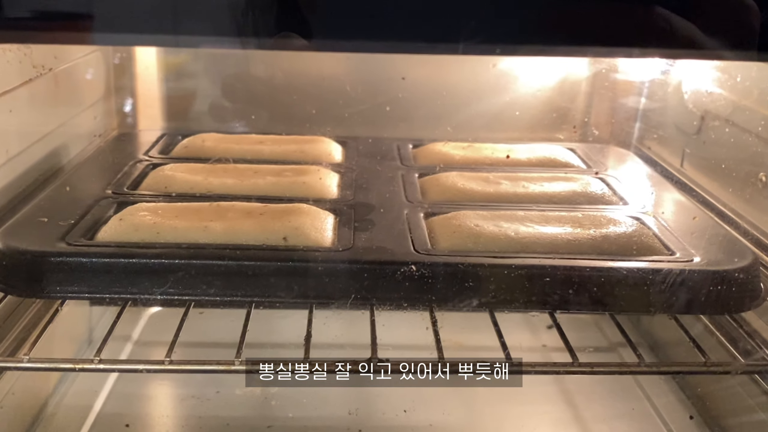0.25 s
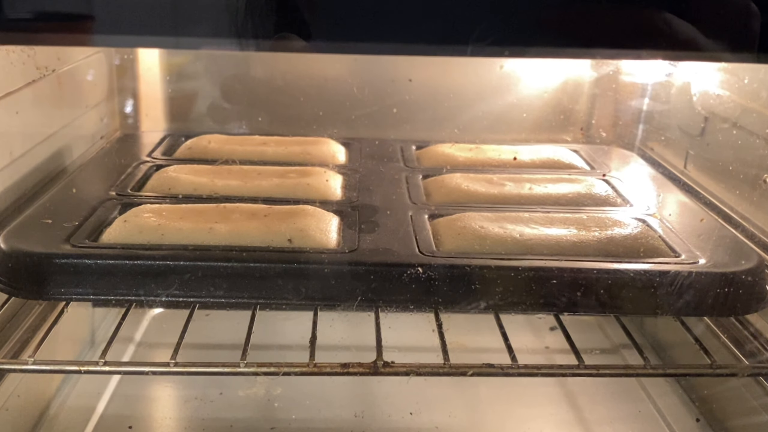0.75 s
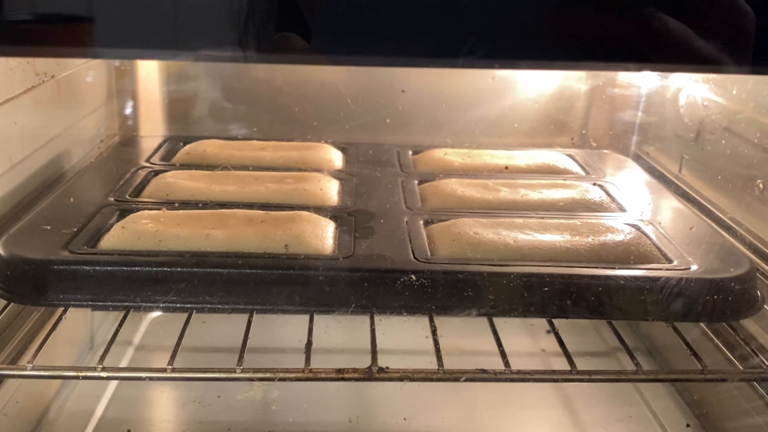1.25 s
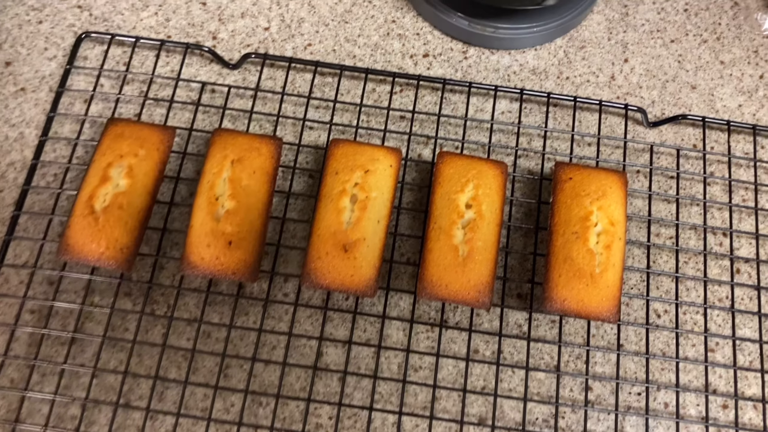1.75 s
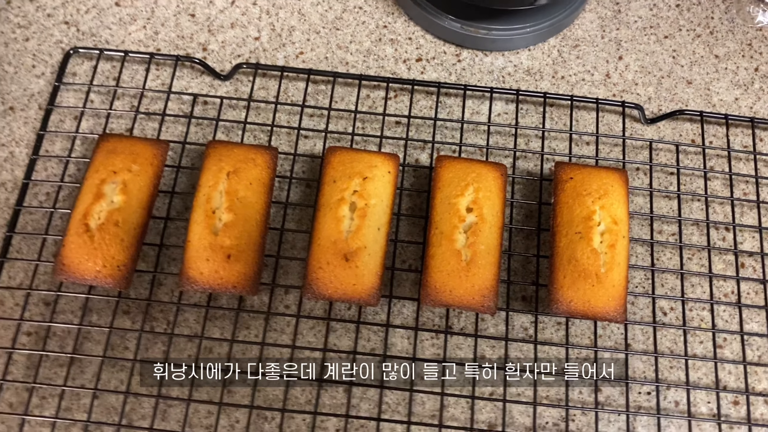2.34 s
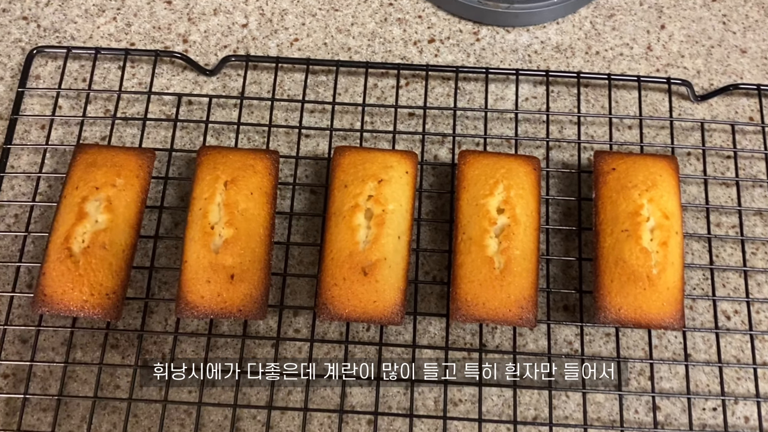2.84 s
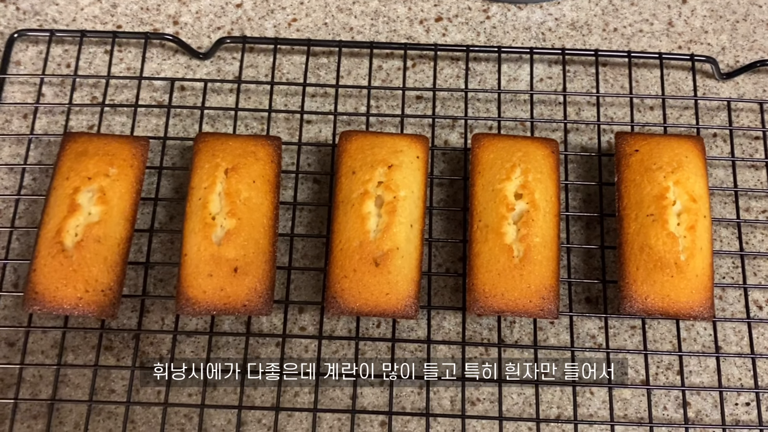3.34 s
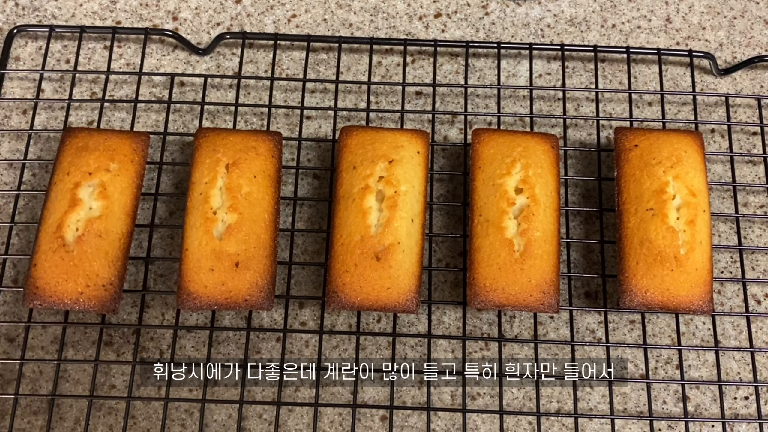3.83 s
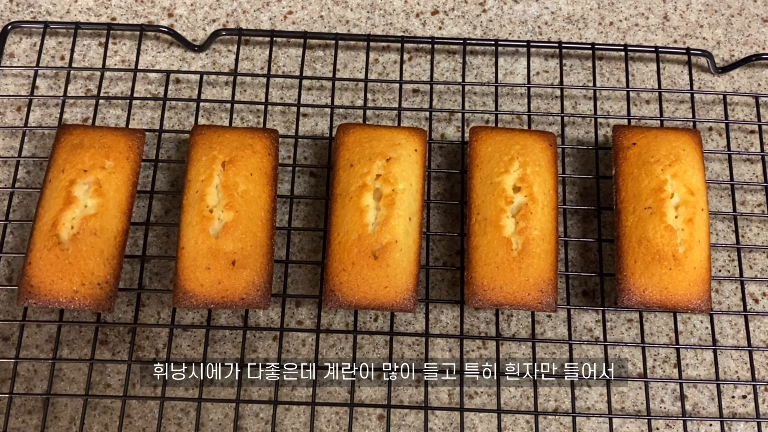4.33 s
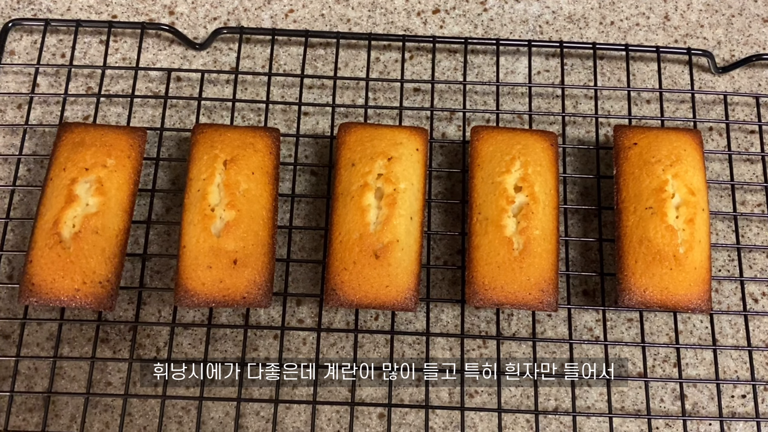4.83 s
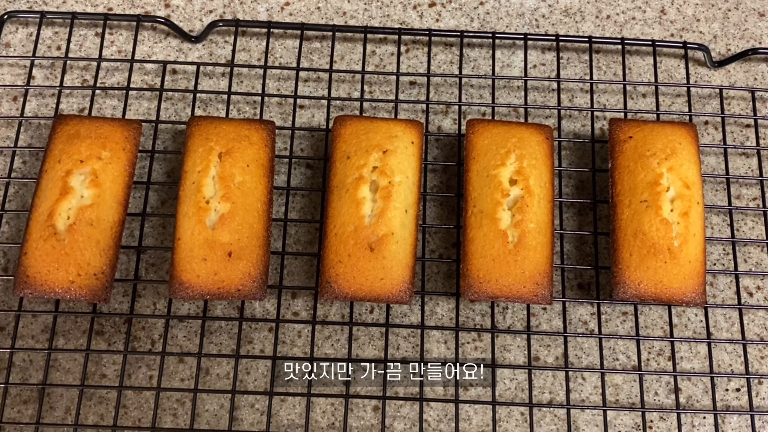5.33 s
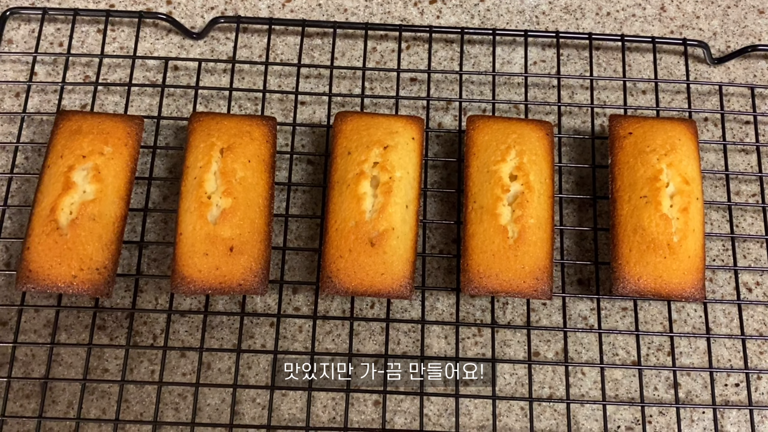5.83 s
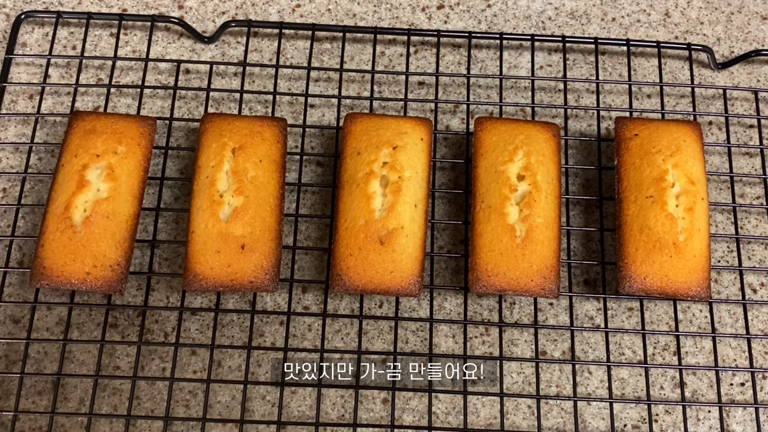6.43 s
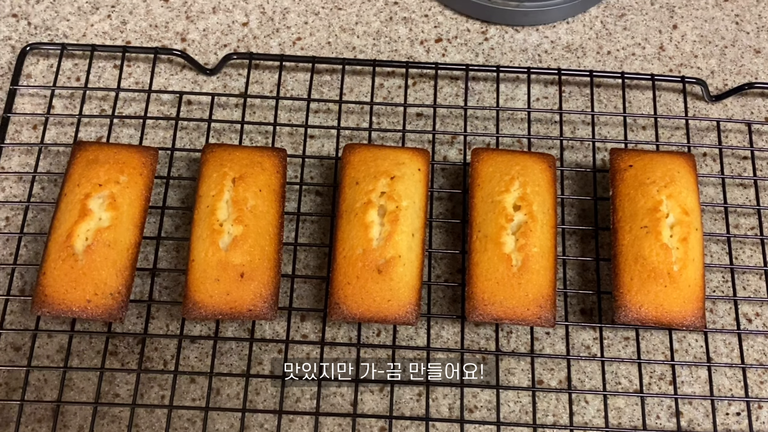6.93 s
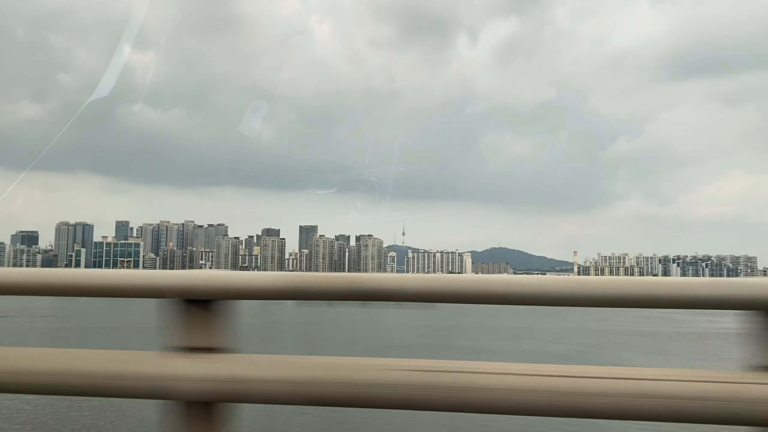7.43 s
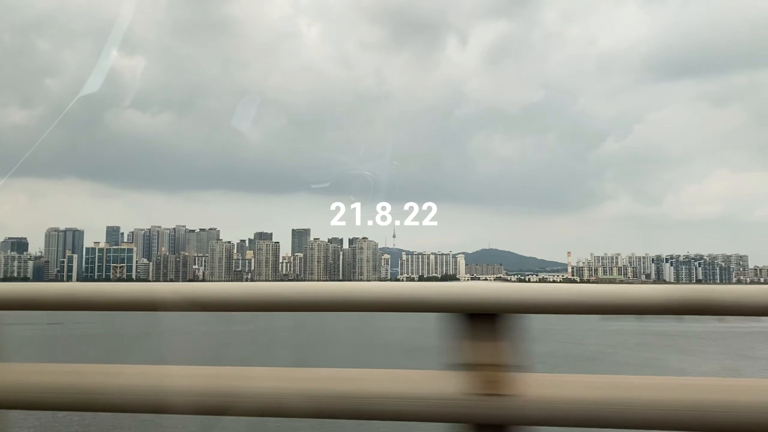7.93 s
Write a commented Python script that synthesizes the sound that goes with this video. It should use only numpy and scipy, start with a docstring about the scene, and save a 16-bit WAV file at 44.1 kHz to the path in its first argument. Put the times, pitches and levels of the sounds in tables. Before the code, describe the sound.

A small clockwork timer ticks faintly and evenly over a very quiet kitchen hum, then a hard cut to loud car road roar and two sharp button clicks.

```python
"""A toaster oven's clockwork timer ticks in a quiet kitchen: each beat is ringing modes plus fading noise.
Filtered noise makes the low appliance hum, oven buzz and hiss; short noise bursts make faint handling.
The scene cuts to a car cabin at speed: low noise makes the tyre boom, higher noise the rushing air.
Near the end a small button, like that of a computer mouse, clicks down and springs back:
each click is a noise snap, short ringing tones and a bright noise echo; a faint swell precedes the second."""
import sys
import numpy as np
from scipy import signal
from scipy.fft import rfft, irfft
from scipy.io import wavfile
from scipy.ndimage import uniform_filter1d

SR = 44100
rng = np.random.default_rng(int(sys.argv[2]) if len(sys.argv) > 2 else 0)


def generate_wav(signal):
    """Clip the signal to [-1, 1] and save it as 16-bit WAV at the path in sys.argv[1]."""
    frames = np.transpose(np.atleast_2d(signal))
    scaled = np.clip(frames, -1, 1) * 32767
    pcm = np.round(scaled).astype(np.int16)
    wavfile.write(sys.argv[1], SR, pcm)


N = 360280
T = np.arange(N) / SR  # time of every sample [s]

# clear tones of the timer housing: (frequency [Hz], relative level [dB], time to fall 60 dB [s])
TIMER_TONES = [(1442, -1, .1), (2020, 1.5, .065), (2095, 2, .075), (3057, -4, .06), (3402, -3, .06),
               (3671, 0, .065), (4015, -4, .055), (4400, -3, .07), (5211, -6, .07), (6470, -7, .08),
               (10465, -2, .03), (12930, -2, .025)]
# dense ring of the gear plates: (frequency [Hz], relative level [dB])
GEAR_PLATE_COLOUR = [(500, -15), (900, -8), (1800, -2), (2500, -8), (3400, 1), (4400, 0), (4850, -10),
                     (5300, -1), (7200, -2), (8200, -4), (10600, -3), (12000, -11), (13000, -5),
                     (14000, -25), (16000, -42)]
# the timer's echo in the kitchen: (frequency [Hz], relative level [dB])
KITCHEN_ECHO_COLOUR = [(400, -9), (1400, 0), (2500, -2), (3700, 2), (4450, 1), (4850, -8), (5250, -1),
                       (6800, -1), (7800, -9), (10500, -11), (13000, -16), (14200, -40)]
# the timer at the oven door, then from the worktop:
# (start [s], end [s], time of one tick [s], relative level [dB])
TIMER_SPELLS_HEARD = [(0, 1.5, .1775, -57.3), (1.5, 7.1, 1.8070, -59.8)]
# building rumble: (frequency [Hz], relative level [dB])
RUMBLE_COLOUR = [(20, -27), (35, -13), (50, -5), (68, 0), (82, -4), (97, -1), (120, -6), (150, -9),
                 (220, -30)]
# appliance drone: (frequency [Hz], relative level [dB])
DRONE_COLOUR = [(90, -22), (160, 0), (215, -2), (265, -1), (370, 0), (450, -5), (600, -8), (800, -14),
                (1300, -19), (2000, -32)]
# wavering hum lines within the drone: (frequency [Hz], relative level [dB])
HUM_LINES = [(302, -9), (360, -15)]
# even kitchen hiss: (frequency [Hz], relative level [dB])
HISS_COLOUR = [(200, -1), (700, -1.5), (1000, -2), (1300, -1.5), (1800, -11), (3000, -19), (5000, -27),
               (8000, -24.5), (12500, -28), (14000, -39)]
# shared level of rumble and drone, which sinks for a while: (time [s], level [dB])
BACKGROUND_LEVEL = [(0, -65.5), (1.48, -65.5), (1.65, -71), (2.45, -70.5), (3.2, -75.5), (3.8, -74.5),
                    (4.25, -65.5), (7.1, -65)]
# swells of the oven shell's buzz: (centre [s], half-width [s], level [dB])
OVEN_BUZZ_SWELLS = [(.02, .11, -62), (1.24, .13, -64)]
# light taps of handling: (time [s], approximate peak level [dB], time to fall 60 dB [s])
HANDLING_TAPS = [(4.5206, -58, 0.21), (4.816, -56, 0.18), (5.0144, -62, 0.18), (6.1144, -51, 0.26)]
# sound colour of the taps: (frequency [Hz], relative level [dB])
TAP_SPECTRUM = [(1000, -20), (3000, -7), (5800, 0), (8500, -1), (12500, -7), (14000, -24)]
# soft brushing: (centre [s], length [s], dull rub level [dB], bright swish level [dB])
HANDLING_BRUSHES = [(1.27, .2, -75, -92), (1.59, .14, -79, -73), (1.78, .12, -82, -71),
                    (1.95, .16, -75, -77), (2.25, .13, -79, -76), (4.84, .05, -82, -74),
                    (5.05, .09, -84, -76), (6.98, .34, -76, -80)]
# soft low thuds: (centre [s], level [dB])
LOW_THUDS = [(2.35, -70), (3.47, -63)]
# stereo width in the kitchen: (frequency [Hz], gain of the left-right difference [dB])
KITCHEN_WIDTH = [(400, 0), (900, 2), (1500, 0), (3300, -2), (4800, 1), (6500, -2), (8500, 3), (10500, 7),
                 (12500, 12), (14200, 19), (16000, 16)]
# balance between the ears in the kitchen: (frequency [Hz], left minus right [dB])
KITCHEN_BALANCE = [(60, 0), (200, 1), (330, 3.5), (550, 4), (850, 3), (1800, 1), (6000, 0)]
# tyre boom through the car body: (frequency [Hz], relative level [dB])
BOOM_COLOUR = [(15, -30), (28, -16), (45, -7), (60, -6), (75, -3), (85, -5), (100, 2.5), (112, 1),
               (127, -7), (150, -4), (175, -6), (198, -14), (228, -7), (290, -32)]
# bumps in the road that lift the boom: (time [s], lift [dB])
ROAD_BUMPS = [(7.14, 5), (7.85, 3.5), (8.0, 2)]
# rush of tread and wind: (frequency [Hz], relative level [dB])
RUSH_COLOUR = [(180, -16), (250, -1), (290, -5), (400, -9), (500, -11), (600, -17), (820, -16), (1050, -19),
               (1300, -22), (1900, -30), (3000, -40), (4300, -48), (5300, -56), (8000, -58), (9500, -69)]
# ringing cabin panels: (frequency [Hz], width [Hz], level relative to the rush [dB])
CABIN_PANELS = [(354, 13, -4), (446, 16, -12), (1245, 35, -21)]
# balance between the ears in the car: (frequency [Hz], left minus right [dB])
CABIN_BALANCE = [(100, 0), (150, -1), (215, -5), (330, -2), (500, 1), (800, 2), (2000, 0)]
# button going down: (time [s], snap level [dB], ring level [dB], echo level [dB])
PRESS_STROKE = (7.8963, -19, -6.5, -35.5)
# button springing back: (time [s], snap level [dB], ring level [dB], echo level [dB])
RELEASE_STROKE = (8.025, -10.5, -12, -35)
# tones of the press: (frequency [Hz], relative level [dB], time to fall 60 dB [s])
PRESS_TONES = [(820, -15, .03), (1450, -20, .012), (2200, -12, .016), (3110, -18, .015), (3400, -19, .015),
               (4310, -14, .018), (4950, -21, .012), (5904, -18, .012), (6940, -21, .02), (9450, -22, .016),
               (10050, -22, .012), (12500, -13, .006), (14095, 1.8, .018)]
# tones of the release: (frequency [Hz], relative level [dB], time to fall 60 dB [s])
RELEASE_TONES = [(2502, -14, .011), (3300, -17, .011), (4322, -13, .011), (6830, -5, .008),
                 (8087, -5.5, .012), (11055, -8, .01), (12220, -5, .01), (12480, -2, .013),
                 (13370, -1, .01), (14320, -8, .009)]
# snap of the button: (frequency [Hz], relative level [dB])
SNAP_COLOUR = [(500, -9), (2000, -12), (4300, -8), (5300, -16), (6900, 0), (10500, -8), (12800, 4),
               (14500, -2), (16000, -16)]
# short echo of the button: (frequency [Hz], relative level [dB])
BUTTON_ECHO_COLOUR = [(700, -4), (2600, -3), (4300, -9), (5400, -16), (6700, 0), (8200, 0), (10500, -12),
                      (11500, -11), (13000, 1), (14400, 1), (15200, -14), (16000, -30)]

CUT_S, TOP_HZ = 7.124, 16000
# one full swing of the balance wheel, and the tock that follows each tick
SWING_S, TOCK_LAG_S = .4696, .2385
TOCK_DB, BEAT_SCATTER_DB = -1.8, .6
SHOT_CUT_S = 1.5  # the view cuts from the oven door to the worktop
# rumble and drone are relative to the background level
RUMBLE_DB, RUMBLE_RISE_DB_PER_S, DRONE_DB, HISS_DB = -3.5, .7, 1.7, -76.3
BUZZ_HZ, BUZZ_DB = 244, -74
RUB_HZ, SWISH_HZ = 2400, 9300
THUD_HZ, THUD_WIDTH_HZ, THUD_S = 68, 14, .14
BOOM_DB, BUMP_S, RUSH_DB = -23.2, .025, -38.6


def undb(db):
    """Turn decibels into a plain multiplier."""
    return 10 ** (np.asarray(db) / 20)


def unit(x):
    """Scale to an average strength (rms) of 1."""
    return x / np.sqrt(np.mean(x ** 2))


def curves(table):
    """Join the points of each column after the time with straight lines."""
    s, *columns = np.transpose(table)
    return [np.interp(T, s, column) for column in columns]


def swell(s, half_width_s):
    """A smooth rise and fall around time s, 1 at its top."""
    return np.exp(-((T - s) / half_width_s) ** 2)


def noise(spectrum, size=N, channels=1):
    """Noise of rms 1, coloured by (frequency [Hz], level [dB]) points."""
    hz, db = np.transpose(spectrum)
    f = np.maximum(np.fft.rfftfreq(size, 1 / SR), 1)
    gain = undb(np.interp(np.log(f), np.log(hz), db))
    # roll off beyond the first and last points
    gain = gain * np.minimum(f / hz[0], 1) ** 2 * np.minimum(hz[-1] / f, 1) ** 4
    white = rng.standard_normal((channels, size))
    return unit(irfft(rfft(white) * gain, size))


def band(hz, width_hz, size=N, channels=1):
    """Noise of rms 1 gathered around one pitch, with steep sides."""
    f = np.fft.rfftfreq(size, 1 / SR)
    white = rng.standard_normal((channels, size))
    return unit(irfft(rfft(white) / (1 + ((f - hz) / width_hz) ** 2 / 2) ** 2, size))


def diffuse(pair, wide_hz, width):
    """Spread two unrelated signals in stereo: long waves reach both ears alike."""
    size = pair.shape[1]
    f = np.fft.rfftfreq(size, 1 / SR)
    side = irfft(rfft(pair[1]) * width * np.minimum(f / wide_hz, 1), size)
    return np.array([pair[0] + side, pair[0] - side])


def fade(t60, size):
    """Die away steadily, 60 dB down after t60 seconds."""
    return np.exp(-np.log(1000) * T[:size] / t60)


def ring(modes, size, scatter_db=0):
    """A struck body sounds several fading tones; each blow can weight them a little differently."""
    out = np.zeros(size)
    for k, (hz, db, t60) in enumerate(modes):
        gain = undb(db + scatter_db * rng.standard_normal())
        tone = gain * fade(t60, size) * np.sin(2 * np.pi * hz * T[:size])
        out += tone * (-1) ** k  # every other tone starts downwards
    return out


def add(out, s, x):
    """Mix x into out from time s."""
    start = int(s * SR)
    out[:, start:start + x.shape[-1]] += x[..., :N - start]


def beats(count=16):
    """Times and levels of the clockwork: a tick on every swing, a softer tock on the way back."""
    found = []
    for start, end, tick_s, db in TIMER_SPELLS_HEARD:
        for swing in np.arange(-1, count):
            for lag, softer_db in [(0, 0), (TOCK_LAG_S, TOCK_DB)]:
                s = tick_s + swing * SWING_S + lag
                if start < s < end:
                    found.append((s, db + softer_db + BEAT_SCATTER_DB * rng.standard_normal()))
    return found


def timer(size=10000):
    """The balance wheel strikes two pallets in turn; each rings the plates its own way, and the kitchen answers."""
    out = np.zeros((2, N))
    pallets = [noise(GEAR_PLATE_COLOUR, size, channels=2) for _ in range(2)]
    echo = noise(KITCHEN_ECHO_COLOUR, size, channels=2)
    echo = echo * fade(.24, size) * (1 - fade(.03, size))  # builds up, then dies away
    for k, (s, db) in enumerate(beats()):
        fresh = noise(GEAR_PLATE_COLOUR, size, channels=2)
        plates = (.8 * pallets[k % 2] + .6 * fresh) * fade(.046, size)
        # every tooth meets the pallet a little differently, which shifts the ring
        tuned = [(hz * (1 + .013 * rng.standard_normal()), level, t60) for hz, level, t60 in TIMER_TONES]
        modes = np.array([ring(tuned, size, scatter_db=2.5), .4 * ring(tuned, size, scatter_db=4)])
        blow = undb(3.8) * plates + undb(-9) * modes + undb(-8.5) * echo
        tick = diffuse(blow, 700, .75) * (1 - fade(.003, size))  # softened start
        add(out, s, undb(db) * tick)
        # the pin chatters on the tooth: two bounces, the second softer
        add(out, s + rng.uniform(.001, .004), undb(db - 8.5) * tick)
        add(out, s + rng.uniform(.005, .009), undb(db - 11) * tick)
        # the escape wheel unlocks with two much softer clicks ahead of the beat
        add(out, s - rng.uniform(.04, .048), undb(db - 25 + 4 * rng.standard_normal()) * tick)
        add(out, s - rng.uniform(.012, .018), undb(db - 24 + 3 * rng.standard_normal()) * tick)
    return out


def oven_buzz():
    """The oven's shell buzzes with a wandering pitch and swells now and then, heard only at the oven door."""
    # keep only the wave's phase, so its strength does not flutter
    phase = np.angle(signal.hilbert(band(BUZZ_HZ, 6, channels=2)))
    buzz = unit(np.cos(phase))
    strength = undb(BUZZ_DB) + sum(undb(db) * swell(s, width) for s, width, db in OVEN_BUZZ_SWELLS)
    at_door = np.clip((SHOT_CUT_S - T) / .1, 0, 1)
    return strength * at_door * buzz


def kitchen():
    """Building rumble, an appliance drone with wavering hum lines, the oven's buzz and an even hiss."""
    background_db, = curves(BACKGROUND_LEVEL)
    rumble = undb(RUMBLE_DB + RUMBLE_RISE_DB_PER_S * T) * noise(RUMBLE_COLOUR, channels=2)
    hum = sum(undb(db) * band(hz, 3.5, channels=2) for hz, db in HUM_LINES)
    drone = undb(DRONE_DB) * (undb(-1.2) * noise(DRONE_COLOUR, channels=2) + hum)
    hiss = undb(HISS_DB) * noise(HISS_COLOUR, channels=2)
    air = undb(background_db) * (rumble + drone) + oven_buzz() + hiss
    return diffuse(air, 700, 1.0)


def handling(size=12000):
    """Light taps that die away in the room, soft brushing swells and low thuds."""
    out = np.zeros((2, N))
    for s, db, t60 in HANDLING_TAPS:
        tap = diffuse(noise(TAP_SPECTRUM, size, channels=2), 700, .8) * fade(t60, size)
        add(out, s, undb(db - 13) * tap)  # noise peaks rise well above its rms
    dull = signal.butter(10, 12800, fs=SR, output="sos")
    for s, length, rub_db, swish_db in HANDLING_BRUSHES:
        count = int(length * SR)
        # rubbing surfaces catch and slip, so the swell is grainy
        grip = unit(undb(3 * band(60, 120, count)))
        rub = undb(rub_db) * band(RUB_HZ, .36 * RUB_HZ, count, channels=2)
        swish = undb(swish_db) * band(SWISH_HZ, .36 * SWISH_HZ, count, channels=2)
        brush = signal.sosfilt(dull, rub + swish) * grip
        add(out, s - length / 2, diffuse(brush, 700, .8) * np.hanning(count))
    count = int(THUD_S * SR)
    for s, db in LOW_THUDS:
        thud = undb(db) * band(THUD_HZ, THUD_WIDTH_HZ, count) * np.hanning(count)
        add(out, s - THUD_S / 2, thud)
    return out


def widen(pair, spread):
    """Change the left-right difference at each pitch: short waves reach the two ears out of step."""
    hz, db = np.transpose(spread)
    gain = undb(np.interp(np.fft.rfftfreq(N, 1 / SR), hz, db))
    mid = (pair[0] + pair[1]) / 2
    side = irfft(rfft(pair[0] - pair[1]) * gain, N) / 2
    return np.array([mid + side, mid - side])


def lean(pair, balance):
    """Favour one ear, by a different amount at each pitch."""
    hz, db = np.transpose(balance)
    f = np.maximum(np.fft.rfftfreq(N, 1 / SR), 1)
    half = np.interp(np.log(f), np.log(hz), db) / 2
    return irfft(rfft(pair) * undb(np.array([half, -half])), N)


def car():
    """Tyres shake the cabin's low modes; tread and wind rush through the glass and excite the panels."""
    boom_db = BOOM_DB + sum(db * swell(s, BUMP_S) for s, db in ROAD_BUMPS)
    boom = noise(BOOM_COLOUR, channels=2)
    # steady rolling keeps the boom's strength even from moment to moment
    boom = boom / np.sqrt(uniform_filter1d(boom ** 2, size=3000, axis=1))
    panels = sum(undb(db) * band(hz, width, channels=2) for hz, width, db in CABIN_PANELS)
    rush = noise(RUSH_COLOUR, channels=2) + panels
    return diffuse(undb(boom_db) * boom + undb(RUSH_DB) * rush, 620, .9)


def button(stroke, modes, size=8000):
    """A metal leaf snaps over, rings the plastic shell and leaves a short bright echo."""
    s, snap_db, ring_db, echo_db = stroke
    out = np.zeros((2, N))
    snap = noise(SNAP_COLOUR, size) * fade(.007, size)
    echo = noise(BUTTON_ECHO_COLOUR, size) * fade(.17, size)
    add(out, s, undb(snap_db) * snap + undb(echo_db) * echo)
    add(out, s + .0003, undb(ring_db) * ring(modes, size))
    return out


def pre_release_swell(size=3300):
    """A faint bright noise swell just before the second click."""
    out = np.zeros((2, N))
    add(out, 7.972, undb(-53) * noise(SNAP_COLOUR, size) * np.hanning(size))
    return out


def scene():
    """The kitchen, then a hard cut to the car with the button clicks on top."""
    indoors = lean(widen(timer() + kitchen() + handling(), KITCHEN_WIDTH), KITCHEN_BALANCE)
    driving = lean(car(), CABIN_BALANCE)
    press = button(PRESS_STROKE, PRESS_TONES)
    clicks = press + pre_release_swell() + button(RELEASE_STROKE, RELEASE_TONES)
    cut = np.clip((T - CUT_S) / .0004, 0, 1)
    return (1 - cut) * indoors + cut * driving + clicks


def record(dry):
    """A steep filter removes the highest treble, above TOP_HZ."""
    return signal.sosfilt(signal.ellip(8, .2, 70, TOP_HZ, fs=SR, output="sos"), dry)


dry = scene()
out = record(dry)
generate_wav(out)
```